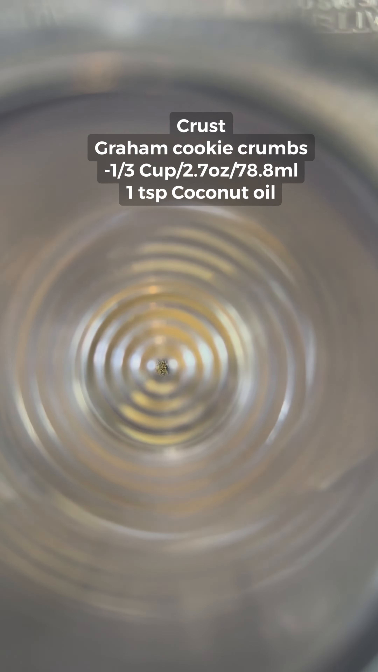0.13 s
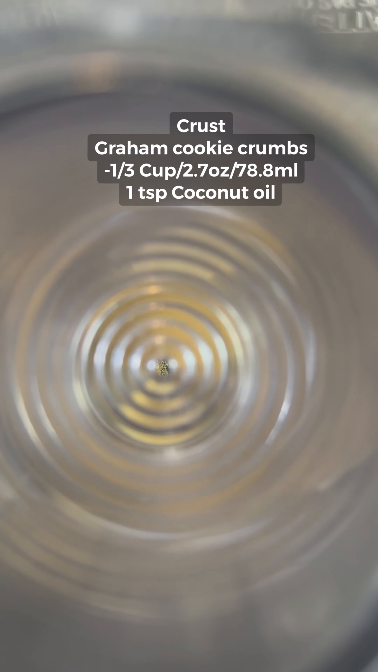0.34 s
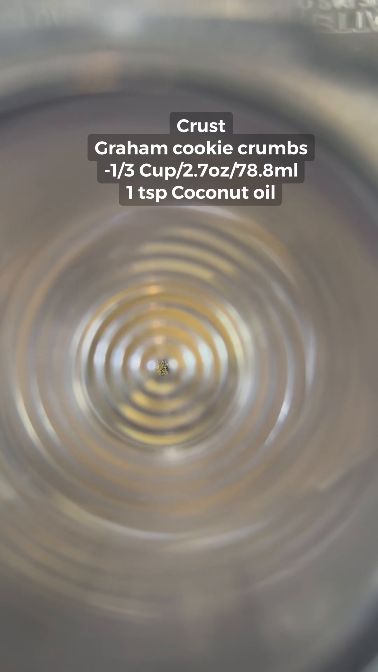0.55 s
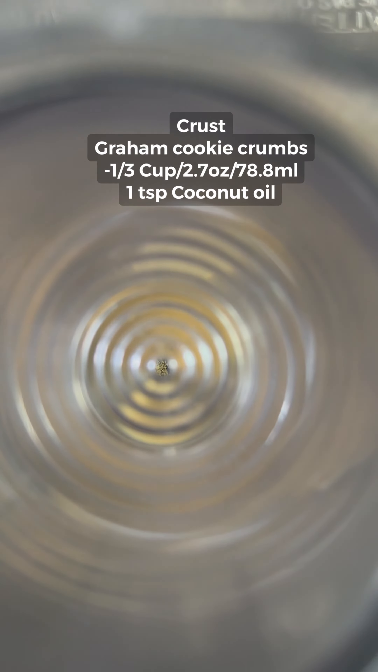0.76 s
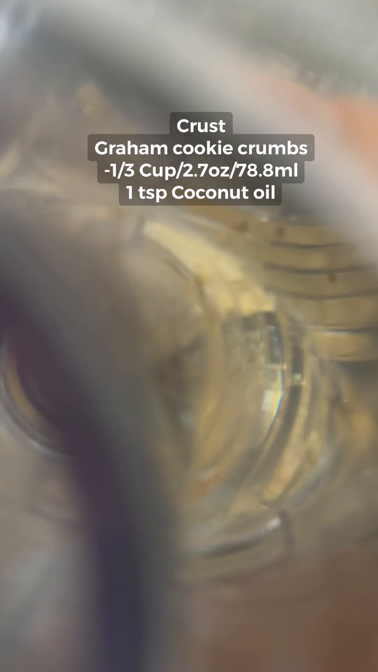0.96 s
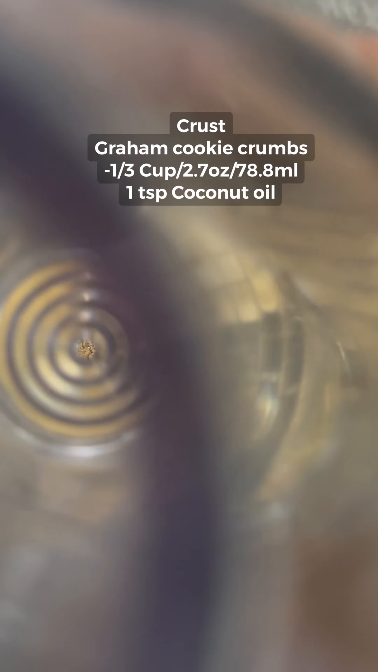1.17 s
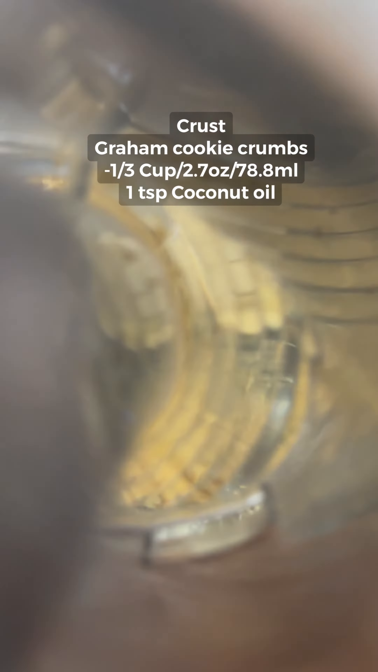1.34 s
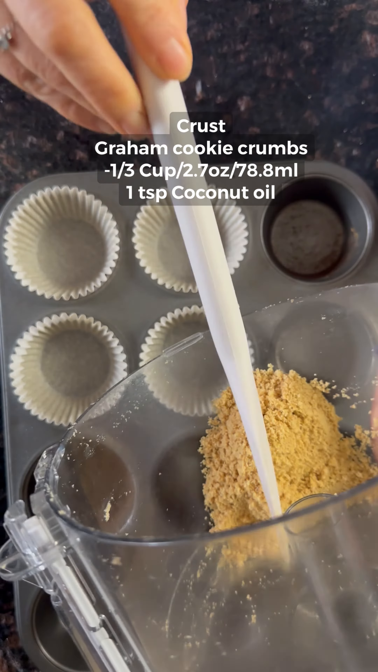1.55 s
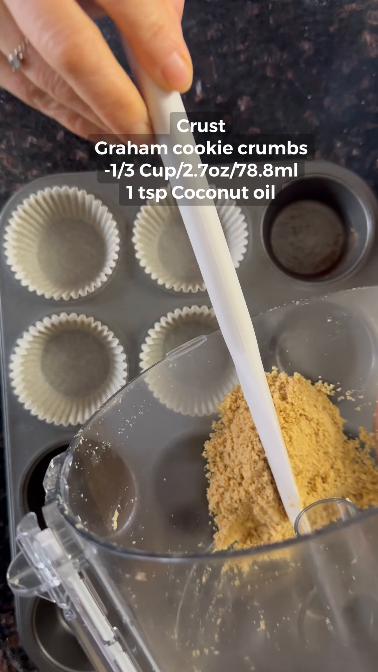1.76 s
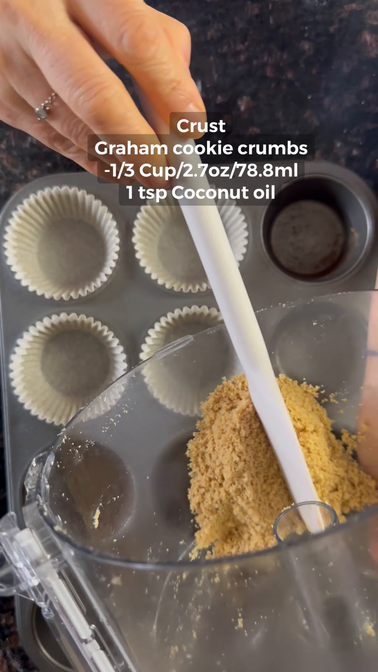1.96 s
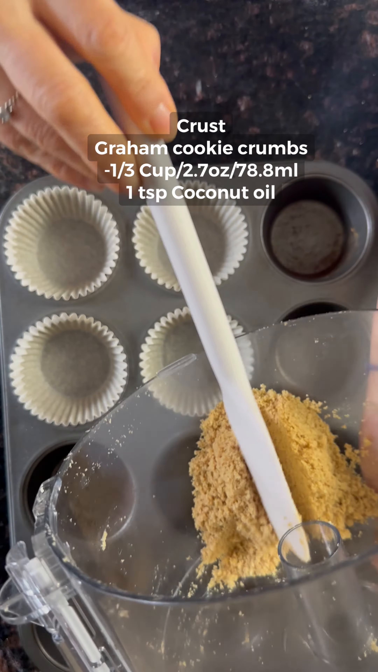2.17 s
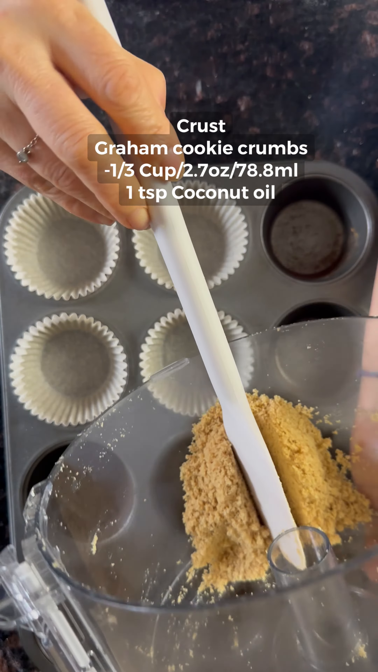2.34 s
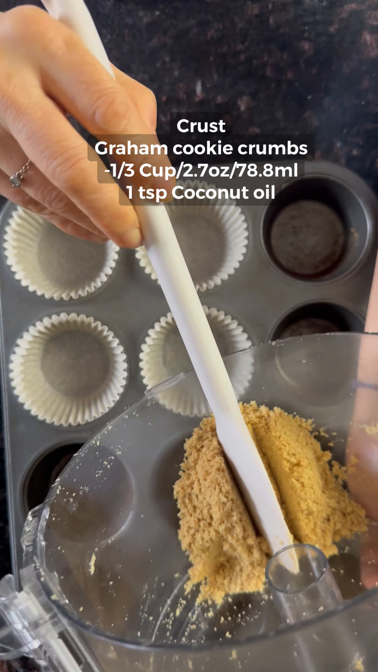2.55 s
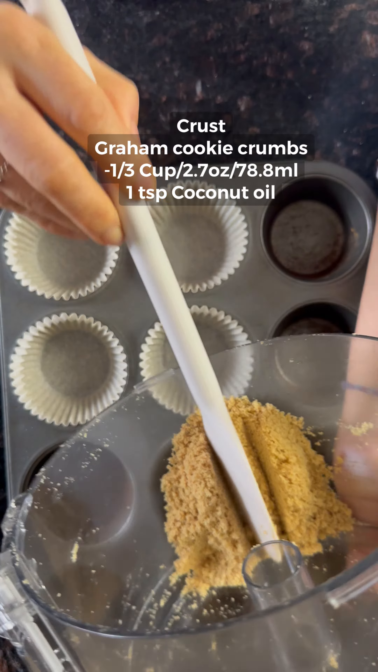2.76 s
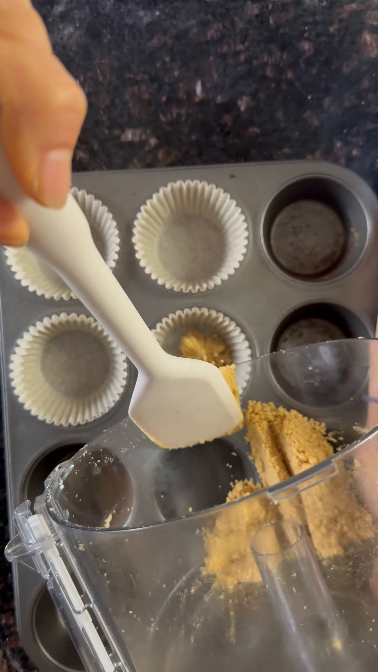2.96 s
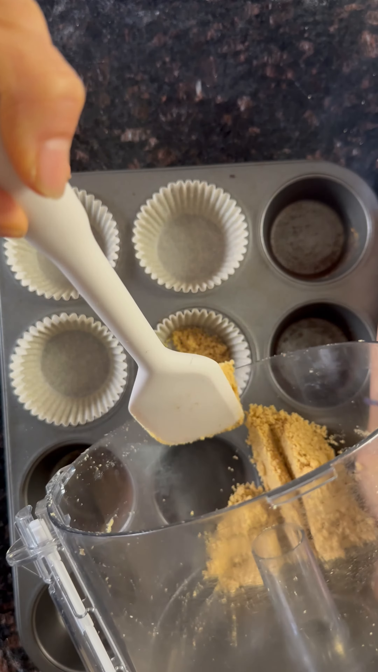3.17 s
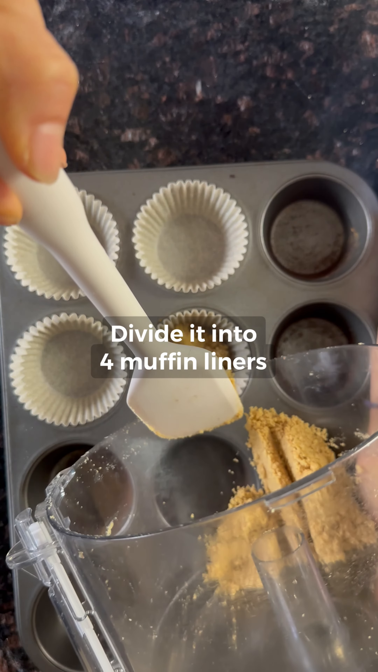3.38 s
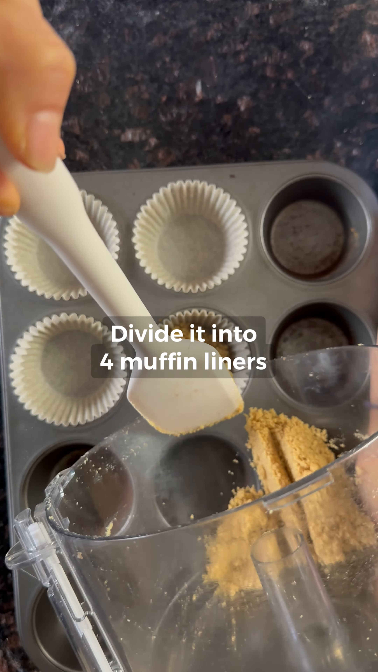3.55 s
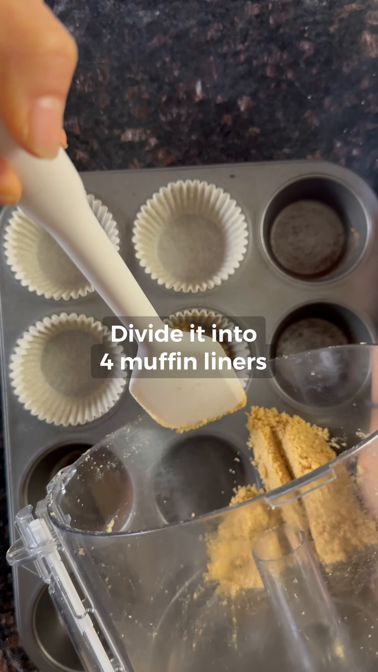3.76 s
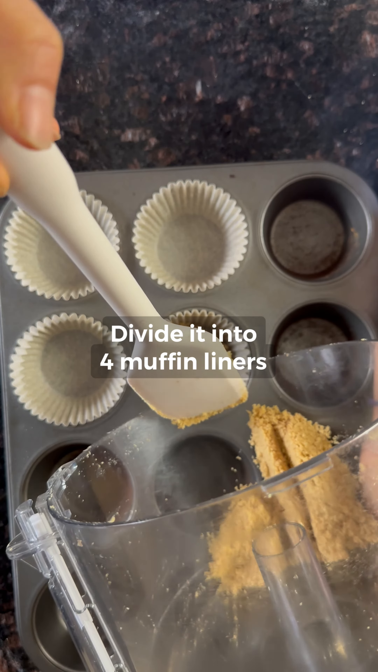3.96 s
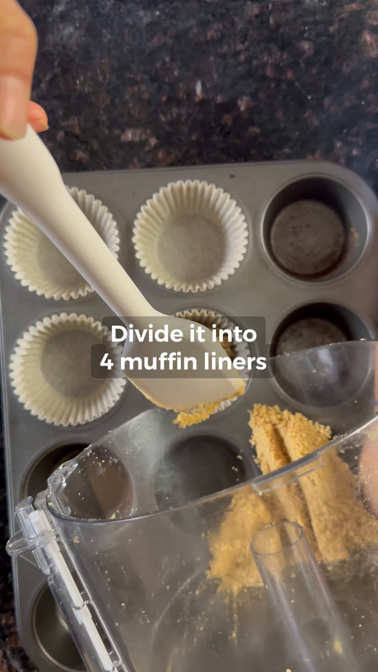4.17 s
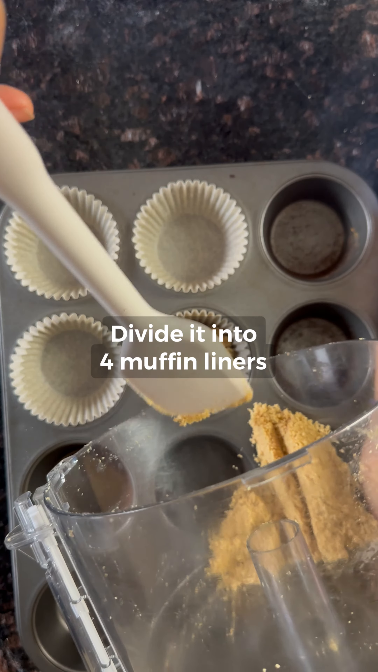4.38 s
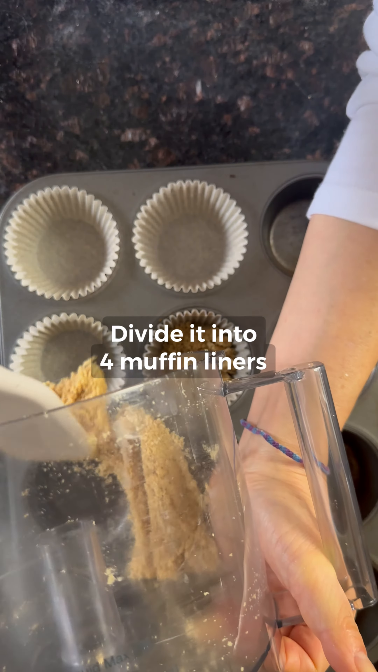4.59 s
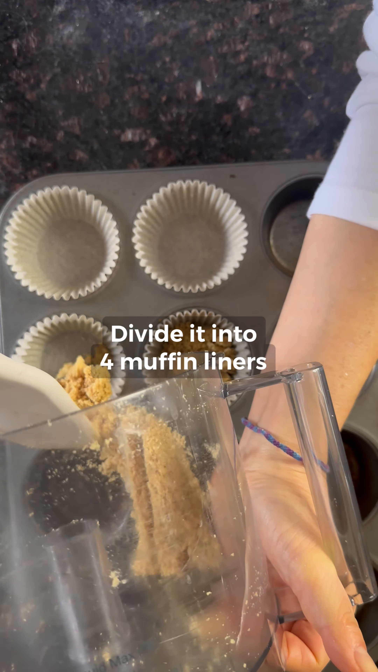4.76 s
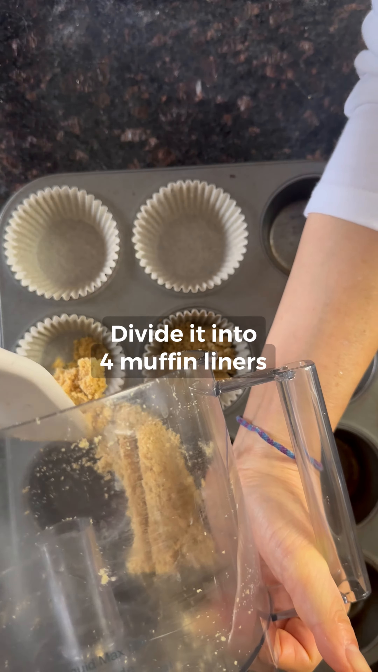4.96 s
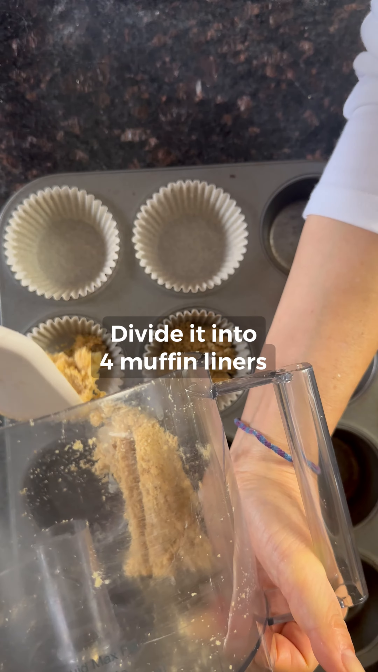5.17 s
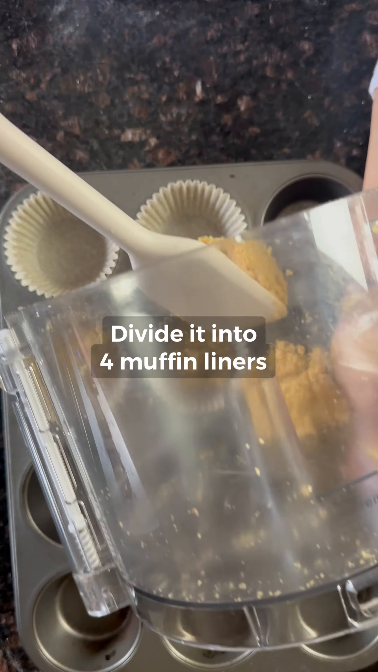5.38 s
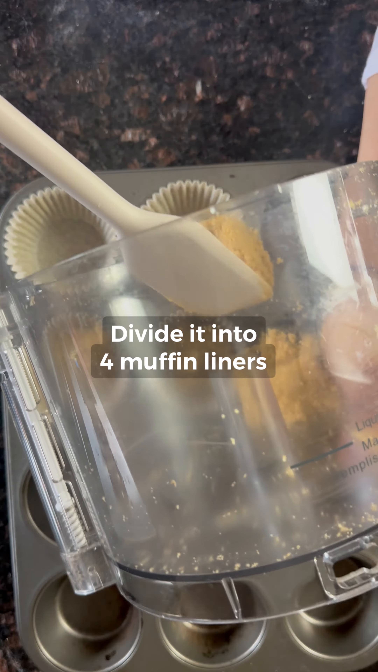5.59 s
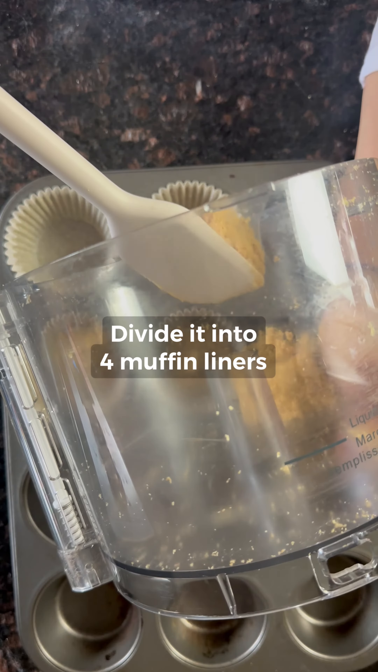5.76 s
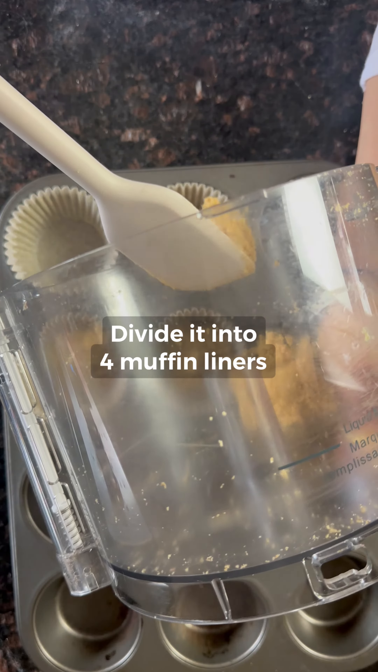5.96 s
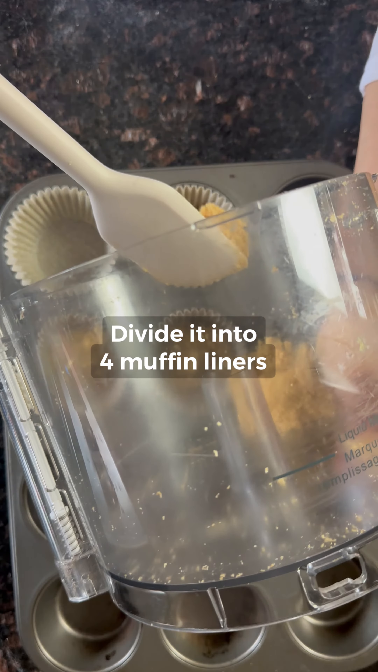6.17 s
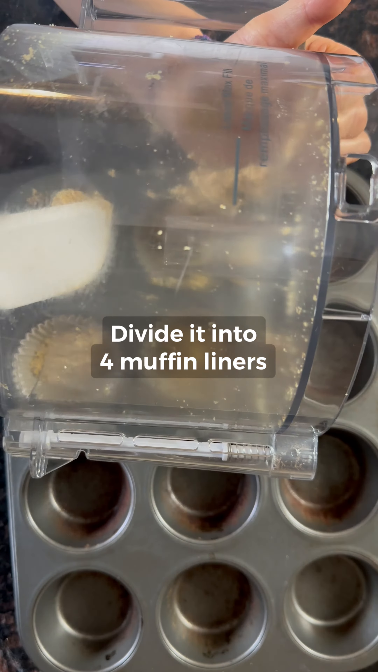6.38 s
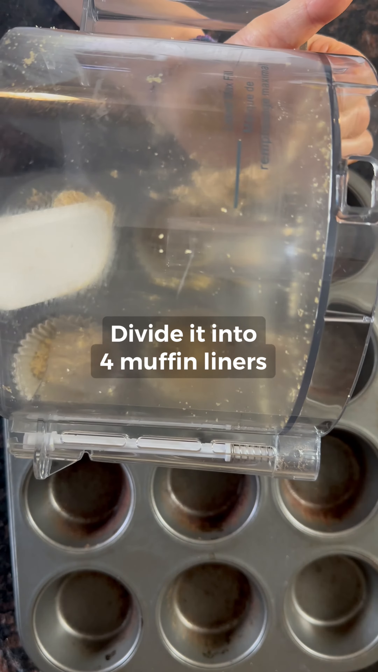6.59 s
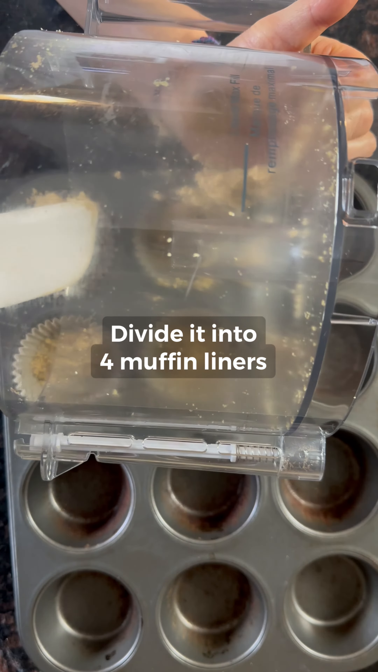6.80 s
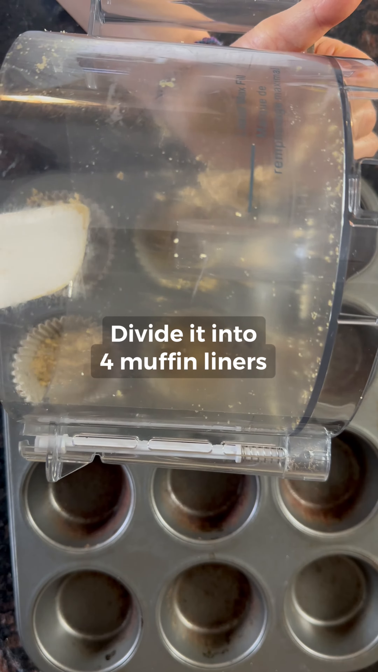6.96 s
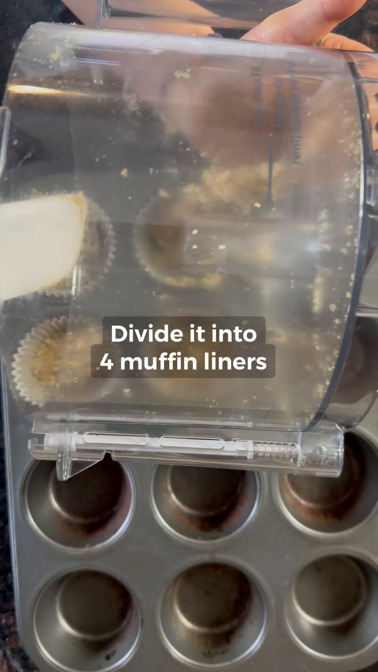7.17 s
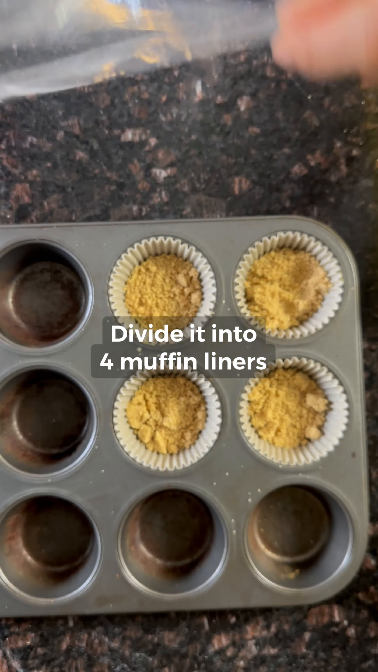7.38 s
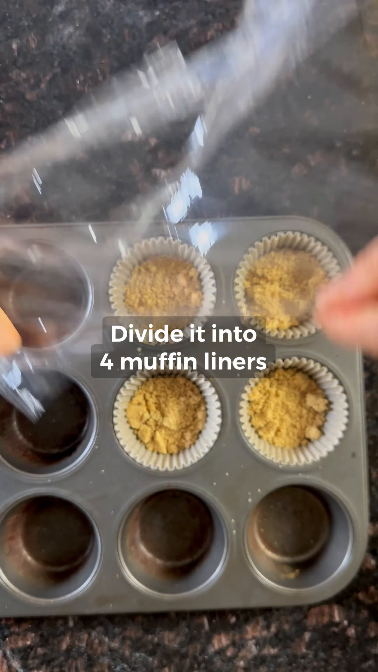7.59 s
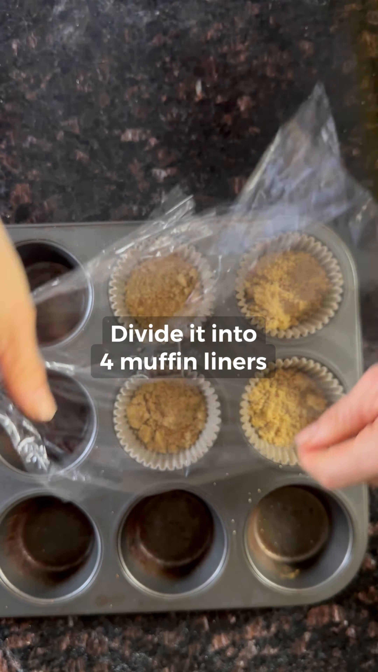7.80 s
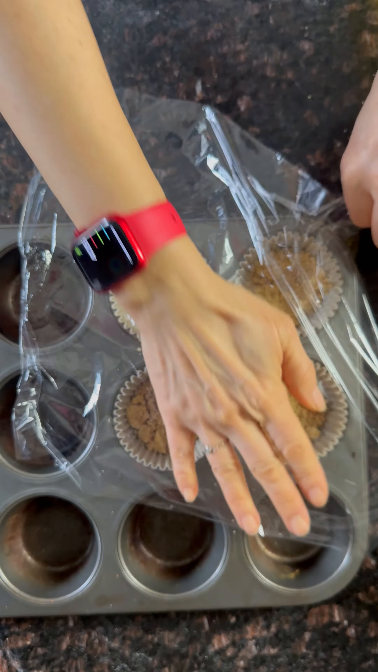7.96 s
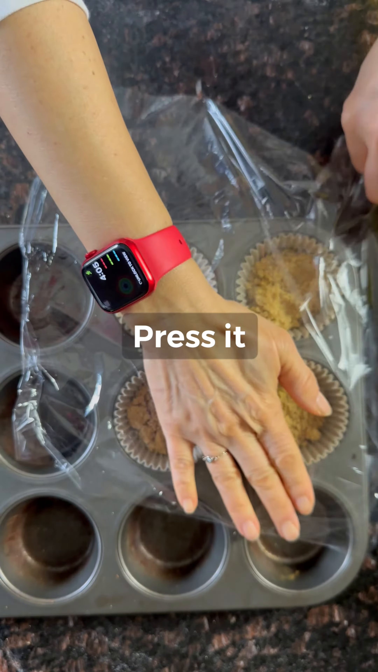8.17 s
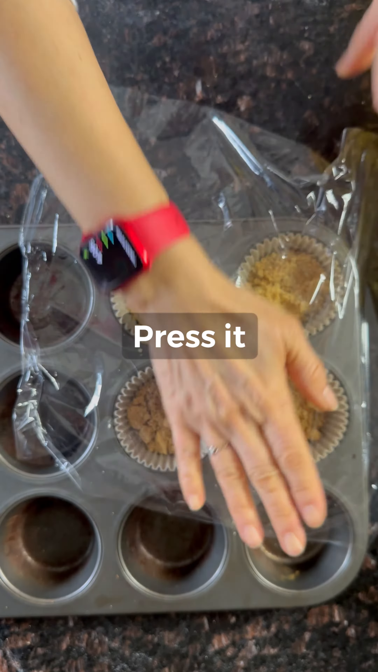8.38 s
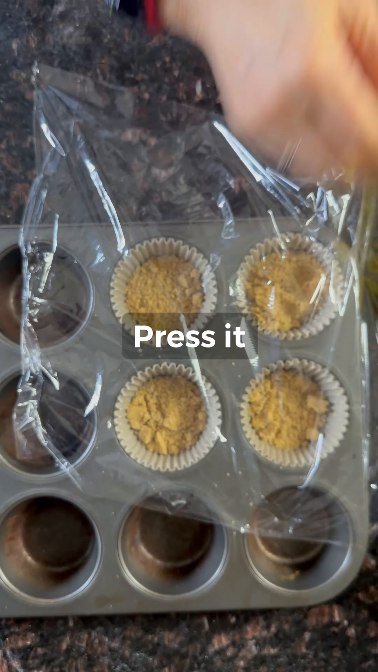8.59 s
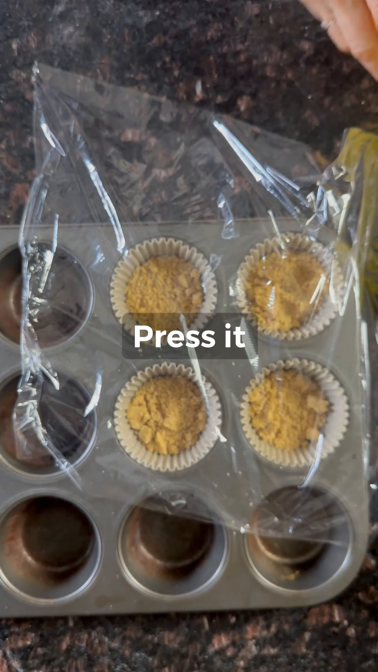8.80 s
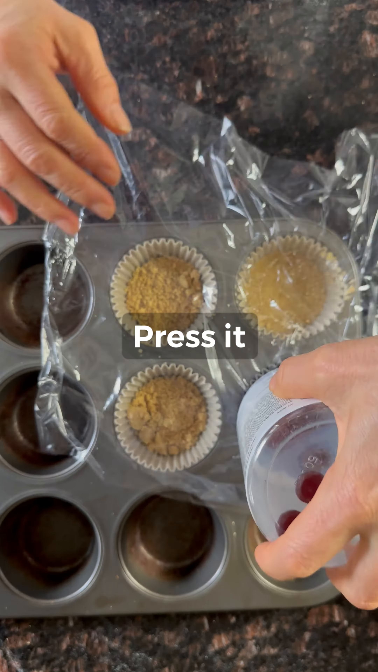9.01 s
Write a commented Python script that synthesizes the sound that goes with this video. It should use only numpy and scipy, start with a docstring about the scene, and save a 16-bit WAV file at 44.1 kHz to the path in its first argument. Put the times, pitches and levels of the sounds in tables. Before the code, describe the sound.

A harsh small motor runs under a second and stops dead. After faint knocks comes one strong plastic clack. Then quiet, dry taps, ticks and gritty scrapes of a spatula on a thin plastic bowl, with dull handling bumps. Cling film rustles and snaps, skin squeaks briefly, and a baking tin rattles. Close stereo microphone, short kitchen reverberation, faint hum and ventilation.

```python
"""A small food processor grinds cookie crumbs and stops dead: buzz and blade tones over pulsing noise.
Its plastic lid is unlatched with a clack: impulses ring modes under a bright burst of grains.
A spatula scrapes crumbs from the bowl into liners in a muffin tin: grains excite a thin resonant wall.
Cling film, as coloured crackle, is spread and pressed down; the tin rattles and skin squeaks on the film.
Once the motor has stopped, an appliance hums over ventilation noise, in steps of level."""
import sys
import numpy as np
from scipy import signal
from scipy.fft import rfft, irfft, next_fast_len
from scipy.io import wavfile
from scipy.ndimage import uniform_filter1d

SR = 44100
rng = np.random.default_rng(int(sys.argv[2]) if len(sys.argv) > 2 else 0)


def wav_out(sig):
    """Save sig, one row per channel (or a flat mono array), as 16-bit PCM at SR to the path in sys.argv[1]."""
    wavfile.write(sys.argv[1], SR, np.round(np.clip(np.atleast_2d(sig).T, -1, 1) * 32767).astype(np.int16))


N = 398663
TIME = np.arange(N) / SR
MAINS_HZ = 60

# left-right likeness of near sources: f/Hz, likeness [1 = identical]
NEAR_LIKENESS = [(150, 1.0), (700, 0.68), (2400, 0.76), (4400, 0.19), (8000, 0.85), (15000, 1)]
# the spatula taps the bowl, each time at another spot: t/s, peak level/dB, favoured f/Hz
BOWL_TAPS = [(1.838, -35.5, 2600), (2.034, -45.5, 940), (2.263, -38.5, 1280), (2.563, -36.5, 1600),
             (2.589, -37, 1700), (2.74, -36, 520)]
# the palm presses the film onto the tin: t/s, length/s, relative level/dB
FILM_PRESSES = [(8.69, 0.031, -61), (8.759, 0.23, -51), (9.019, .03, -41.5)]


def from_db(db):
    """Logarithmic level law: decibels to amplitude gain."""
    return 10 ** (np.asarray(db) / 20)


def rms_one(x):
    """Power normalisation: scale to unit mean square."""
    return x / np.sqrt(np.mean(x ** 2) + 1e-20)


def at_hz(points, hz):
    """Interpolation of a table on a logarithmic frequency axis."""
    table = np.array(points)
    return np.interp(np.log(hz + 1), np.log(table[:, 0]), table[:, 1])


def colour(x, spectrum, size=8192):
    """Minimum-phase filtering: a causal response of the given spectrum; white noise keeps its power."""
    gain = from_db(at_hz(spectrum, np.fft.rfftfreq(size, 1 / SR)))
    cepstrum = irfft(np.log(gain))
    # folding the cepstrum onto positive time makes the response causal
    cepstrum[1:size // 2] *= 2
    cepstrum[size // 2 + 1:] = 0
    response = irfft(np.exp(rfft(cepstrum)))
    return signal.oaconvolve(np.atleast_2d(x), response[None] / np.linalg.norm(response))[:, :N]


def spread(pair, likeness):
    """Interaural coherence: mixing unrelated signals as mid and side sets their likeness by frequency."""
    size = next_fast_len(N)
    alike = np.clip(at_hz(likeness, np.fft.rfftfreq(size, 1 / SR)), -.999, .9999)
    mid, side = rfft(pair, size) * np.sqrt([(1 + alike) / 2, (1 - alike) / 2])
    return irfft(np.array([mid + side, mid - side]), size)[:, :N]


def drift(rate_hz):
    """Low-pass random process: slow chance with unit rms."""
    step = 40  # samples between the computed values
    r = np.exp(-2 * np.pi * step * rate_hz / SR)
    settle = 2000  # discarded values
    noise = rng.standard_normal(N // step + settle + 2)
    slow = signal.lfilter([1], [1, -2 * r, r * r], noise)[settle:]
    return np.interp(np.arange(N) / step, np.arange(len(slow)), rms_one(slow))


def grains(per_s, unevenness_db):
    """Poisson impact noise: two streams of tiny impulses of uneven size and random sign; unit power."""
    born = rng.random((2, N)) < per_s / SR
    sizes = from_db(unevenness_db * np.minimum(rng.standard_exponential((2, N)), 4))
    return rms_one(born * sizes * np.sign(rng.random((2, N)) - .5))


def resonance(x, hz, width_hz):
    """Damped oscillator: a two-pole resonance with gain 1 at its peak."""
    r = np.exp(-np.pi * width_hz / SR)
    numerator = np.array([1, 0, -1]) * (1 - r * r) / 2
    denominator = [1, -2 * r * np.cos(2 * np.pi * hz / SR), r * r]
    return signal.lfilter(numerator, denominator, x + 1e-18)


def ring(force, modes):
    """Modal superposition: a force drives decaying sines; white noise keeps its power."""
    t = TIME[:SR // 2]
    response = 0
    for k, (hz, db, t60) in enumerate(modes):
        response = response + (-1) ** k * from_db(db - 60 * t / t60) * np.sin(2 * np.pi * hz * t)
    return signal.oaconvolve(force, response / np.linalg.norm(response))[:N]


def contacts(rows, rise_s, fall_s):
    """Power addition of contact forces (s, length, dB): each builds up, holds and dies away."""
    power = np.zeros(N)
    for s, length, db in rows:
        start = int(s * SR)
        t = TIME[:min(N - start, int((length + 10 * fall_s) * SR))]
        build_up = 1 - np.exp(-t / rise_s)
        decay = np.exp(-np.maximum(t - length, 0) / fall_s)
        power[start:start + len(t)] += (from_db(db) * build_up * decay) ** 2
    return np.sqrt(power)


def clicks(rows):
    """Ideal impact: one unit-sample impulse for each row (s, dB)."""
    out = np.zeros(N)
    for s, db in rows:
        out[int(s * SR)] += from_db(db)
    return out


def held(rows, size=256):
    """Stepwise gain: each dB column holds until the next row with a quick fade; silent before the first."""
    s, *columns = np.transpose(rows)
    row = np.searchsorted(s, TIME)
    return [uniform_filter1d(np.append(0, from_db(c))[row], size) for c in columns]


def taps(rows, modes, focus_db):
    """Selective modal excitation: a mode loses focus_db per octave away from each tap's favoured pitch."""
    t = TIME[:SR // 3]
    out = np.zeros(N + SR)
    for s, db, favoured_hz in rows:
        sound = 0
        for hz, mode_db, t60 in modes:
            loss_db = focus_db * abs(np.log2(hz / favoured_hz))
            decay = from_db(mode_db - loss_db - 60 * t / t60)
            sound = sound + decay * np.sin(2 * np.pi * hz * t) * rng.choice([-1, 1])
        start = int(s * SR)
        out[start:start + len(t)] += from_db(db) * sound / np.abs(sound).max()
    return out[:N]


def room(x, early_t60_s=0.12, late_t60_s=0.39, late_db=12.0):
    """Exponential reverberation: quick worktop and bowl reflections plus a diffuse tail, one per ear."""
    t = TIME[:int(.7 * SR)]
    decay = from_db(-60 * t / early_t60_s) + from_db(late_db - 60 * t / late_t60_s)
    tail = rng.standard_normal((2, len(t))) * decay * (t > .003)
    return signal.oaconvolve(x, tail / np.linalg.norm(tail[0]), axes=1)[:, :N]


def kitchen(drone_db=-14.5, drone_width_hz=45, rush_hz=660, rush_width_hz=520):
    """Magnetic hum at twice the mains frequency in a resonant drone, with flow noise and a hollow rush."""
    # background level steps: from t/s, hum level/dB, air level/dB, rush level/dB
    background_steps = [(.82, -50.5, -54.5, -82), (1.435, -39.5, -47.5, -69), (5.35, -39.5, -51, -116)]
    # ventilation noise spectrum: f/Hz, relative level/dB per Hz
    air_spectrum = [(30, -7.5), (80, 5), (220, -3), (340, -16), (720, -20.5), (1050, -28.5), (2100, -28),
                    (3500, -38.5), (7000, -39.5), (12000, -64.5)]
    hum_gain, air_gain, rush_gain = held(background_steps)
    hum = np.sqrt(2) * np.sin(2 * np.pi * 2 * MAINS_HZ * TIME)
    drone = rms_one(resonance(resonance(rng.standard_normal(N), 139.0, drone_width_hz), 129, 41))
    air = colour(rng.standard_normal((2, N)), air_spectrum)
    rush = resonance(rng.standard_normal(N), rush_hz, rush_width_hz)
    rush = rms_one(resonance(rush, rush_hz, rush_width_hz))
    humming = hum_gain * (hum + from_db(drone_db) * drone)
    return humming + air_gain * spread(air, NEAR_LIKENESS) + rush_gain * rush


def bumps(level_db=-5.5, lowest_hz=38):
    """Reciprocity of duration and bandwidth: soft thuds of the bowl shifting in the hand, longer ones duller."""
    # dull handling bumps: t/s, length/s, relative level/dB
    bump_rows = [(1.438, 0.022, -38), (1.627, 0.093, -39.5), (2.11, 0.065, -26), (2.575, 0.069, -26.5),
                 (3.305, 0.063, -40), (4.419, 0.039, -33.5), (4.589, 0.034, -39.5), (5.06, .05, -36),
                 (5.683, 0.099, -42), (7.31, 0.081, -37)]
    bump_cycles = 7.4  # upper band edge times length
    out = np.zeros(N)
    for s, length, db in bump_rows:
        highest_hz = max(bump_cycles / length, lowest_hz * 1.2)
        band = signal.butter(3, [lowest_hz, highest_hz], "band", fs=SR, output="sos")
        start, span = int(s * SR), int(2 * length * SR)
        thud = signal.sosfilt(band, rng.standard_normal(SR))[-span:]
        swell = np.sin(np.pi * np.linspace(0, 1, span) ** .5) ** 2
        out[start:start + span] += from_db(level_db + db) * rms_one(thud * swell)
    return out


def dry_clicks(fall_s=0.0015):
    """Exponential relaxation: two dull clicks without ring, each a sudden step that dies away."""
    # dull clicks: t/s, peak level/dB
    click_rows = [(6.337, -33.5), (7.217, -35)]
    return signal.lfilter([1], [1, -np.exp(-1 / (fall_s * SR))], clicks(click_rows) + 1e-18)


def squeaks(jitter=0.068):
    """Stick-slip friction: skin slipping on the film gives unsteady harmonic chirps that sag in pitch."""
    # chirps: t/s, length/s, starting f/Hz, level before the swell/dB
    squeak_rows = [(8.286, 0.028, 1650, -56.5), (8.319, .018, 2750, -55.5)]
    # harmonics: multiple of the pitch, relative level/dB
    partials = [(1, 2), (2, -5), (4, -1), (5, -3)]
    sag_per_s = 2.6  # share of the starting pitch lost per second
    out = np.zeros(N)
    unsteady = 1 + jitter * drift(260)
    for s, length, hz, db in squeak_rows:
        t = TIME[:int(length * SR)]
        span = int(s * SR) + np.arange(len(t))
        phase = 2 * np.pi * np.cumsum(hz * (1 - sag_per_s * t) * unsteady[span]) / SR
        tone = sum(from_db(partial_db) * np.sin(round(k) * phase) for k, partial_db in partials)
        swell = np.sin(np.pi * np.sqrt(t / length)) ** 2
        out[span] += from_db(db) * swell * rms_one(tone)
    return out


def press_force():
    """Contact dynamics: the palm presses quickly and lets go."""
    return contacts(FILM_PRESSES, rise_s=0.003, fall_s=0.012)


def tin(rattle_db=-3.5):
    """Modal ringing: the tin knocks on the counter, and the pressing force makes it rattle there."""
    # knocks on the counter: t/s, peak level/dB, favoured f/Hz
    tin_knocks = [(8.692, -39, 775), (8.761, -34, 1000), (8.783, -34.5, 780), (8.915, -42, 1400),
                  (8.984, -36, 1400), (9.020, -32.5, 1480)]
    # modes of the tin: f/Hz, relative level/dB, t60/s
    tin_modes = [(230, 9, 0.041), (657, 7.5, 0.028), (808, 4.5, 0.041), (1080, -3, 0.04), (1280, 1, 0.015),
                 (1520, -2, 0.023)]
    force = press_force() * grains(per_s=400, unevenness_db=3.5)[0]
    return taps(tin_knocks, tin_modes, focus_db=7.5) + from_db(rattle_db) * ring(force, tin_modes)


def film(clump_db=1.0, crease_s=0.0015):
    """Crackling noise by buckling: moved film rustles in irregular crackles, and whole creases snap over."""
    # film pulled out, laid down and smoothed: t/s, length/s, relative level/dB
    sweeps = [(7.24, 0.32, -58.5), (7.63, 0.17, -55.5), (7.87, 0.22, -63), (7.99, 0.22, -47.5),
              (8.215, 0.078, -60)]
    # single creases snap over: t/s, relative level/dB
    snaps = [(7.358, -44.5), (7.633, -52), (7.739, -58), (7.998, -48), (8.086, -37), (8.117, -41),
             (8.323, -44.5), (8.438, -56), (8.869, -56)]
    # crinkle spectrum: f/Hz, relative level/dB per Hz
    crinkle_spectrum = [(700, -0.5), (2500, -3.5), (4500, -6), (6000, -2.5), (8000, -1), (10500, -10),
                        (13000, -27), (15500, -3.5)]
    # snap spectrum: f/Hz, relative level/dB per Hz
    snap_spectrum = [(500, -2.5), (4500, -7.5), (6300, 5.5), (11000, -11.5), (15500, -1)]
    rest_db = -73.5  # creases keep easing between the moves
    moves = contacts(sweeps, rise_s=0.055, fall_s=0.012) + press_force()
    moves = moves + from_db(rest_db) * (TIME > sweeps[0][0])
    crackles_per_s, crackle_s, crackle_share = 90, .0012, .7
    bursts = grains(crackles_per_s, unevenness_db=1.5)[0] ** 2
    crackles = signal.lfilter([1], [1, -np.exp(-1 / (crackle_s * SR))], bursts + 1e-18)
    flutter = np.sqrt(1 - crackle_share + crackle_share * crackles / crackles.mean())
    flutter = flutter * from_db(clump_db * drift(25))
    crinkles = grains(per_s=5000, unevenness_db=3.0)
    snap_force = contacts([(s, crease_s, db) for s, db in snaps], rise_s=0.0004, fall_s=0.0054)
    creases = snap_force * grains(per_s=7400, unevenness_db=-2.5)
    return colour(moves * flutter * crinkles, crinkle_spectrum) + colour(creases, snap_spectrum)


def wall_resonance(x, size=256):
    """Resonant high-pass: the wall peaks at its lowest resonance, whose pitch moves with the contact point."""
    # lowest resonance at the contact point: t/s, f/Hz
    wall_pitch = [(2.6, 1270), (4.7, 1530), (5.0, 1620), (5.85, 690), (6.36, 1000)]
    damping = .2
    out, state = np.zeros_like(x), np.zeros((2, 2))
    pitch = np.interp(TIME, *np.transpose(wall_pitch))
    for i in range(0, N, size):
        w = 2 * np.pi * pitch[i] / SR
        r = np.exp(-damping * w)
        numerator, denominator = [r, -2 * r, r], [1, -2 * r * np.cos(w), r * r]
        block = x[:, i:i + size] + 1e-18
        out[:, i:i + size], state = signal.lfilter(numerator, denominator, block, zi=state)
    return out


def bowl(force, travel_rate_hz=25, count=36):
    """Modal density of a thin wall: which of many close modes speak changes as the contact point travels."""
    width_hz, share = 170, .3  # share: part of the power that rings
    modes_hz, spacing = np.linspace(800, 8500, count, retstep=True)
    modes_hz = modes_hz + spacing * (rng.random(count) - .5)
    rings = sum(resonance(force * drift(travel_rate_hz), hz, width_hz) for hz in modes_hz)
    ring_gain = np.sqrt(share * 2 * spacing / (np.pi * width_hz))
    return np.sqrt(1 - share) * force + ring_gain * rings


def spatula(crunch_db=0.0, wall_db=-3.0, tick_db=2.5, tick_s=0.0037, judder_db=0.5):
    """Fracture and friction noise: contacts, mostly the spatula's, mix crackle and wall ring by kind."""
    # clumps break off and land in the liners: t/s, length/s, relative level/dB
    clumps = [(2.838, 0.015, -51), (2.944, 0.011, -39), (3.338, 0.024, -41.5), (4.204, 0.0082, -51),
              (4.635, 0.011, -40), (4.669, 0.034, -40.5), (4.708, 0.015, -31), (4.777, 0.0057, -32.5),
              (4.845, 0.0041, -32.5), (4.972, 0.0065, -33), (5.07, 0.058, -40.5), (5.203, 0.048, -42.5),
              (5.332, 0.0067, -36.5), (5.385, 0.015, -38), (5.43, 0.019, -40.5), (5.601, 0.011, -32),
              (5.766, 0.054, -46), (5.831, 0.029, -36), (5.936, 0.027, -45), (5.974, 0.024, -32),
              (6.209, 0.015, -40.5), (6.36, 0.011, -33.5)]
    # short dull rubs on a hollow surface: the spatula on the bowl wall, at 8.172 s the hand on the film:
    # t/s, length/s, relative level/dB
    rubs = [(2.257, 0.013, -52), (2.455, 0.018, -52.5), (2.53, 0.037, -57), (2.56, 0.068, -50),
            (2.731, 0.007, -45), (4.46, 0.0045, -49.5), (4.575, 0.051, -59.5), (6.6, 0.19, -66),
            (6.795, 0.09, -62.5), (8.172, 0.046, -52.5)]
    # the spatula pushes the heap along: t/s, length/s, relative level/dB
    pushes = [(1.5, 1.7, -70.5), (4.085, 0.027, -50.5), (4.372, 0.014, -49.5), (4.52, .11, -72),
              (5.2, 0.12, -48), (6.63, 0.3, -62), (6.97, 0.073, -55)]
    # light ticks of spatula and crumbs, the one at 7.159 s of the film: t/s, relative level/dB
    ticks = [(2.897, -39), (2.933, -30.5), (3.097, -38), (3.148, -45.5), (3.251, -42), (3.313, -41.5),
             (3.614, -57), (4.511, -58), (6.135, -50), (6.795, -46.5), (7.159, -54)]
    # crunch of crumbs: f/Hz, relative level/dB per Hz
    crunch_spectrum = [(1200, -13.5), (2800, -13.5), (4200, -5), (5150, -9.5), (5750, 0), (6700, -1.5),
                       (7700, -1), (9500, -6.5), (11000, -10.5), (13000, -56), (15500, 0)]
    # friction on the hollow surface: f/Hz, relative level/dB per Hz
    wall_spectrum = [(500, -4), (1400, -2.5), (2900, 3.5), (4100, -1), (6000, -18.5)]
    clump_body_db, tick_body_db = -12, -18  # dull body, relative to clump and tick
    trickle_db, rub_crunch_db = -25, -5  # trickle relative to clump; crackle relative to rub
    scuff_s, scuff_db = 0.0038, -10.5  # the blade scuffs the wall as it lands; relative to the tap

    crush = contacts(clumps, rise_s=0.0015, fall_s=0.0068)
    thump = from_db(clump_body_db) * contacts(clumps, rise_s=0.0013, fall_s=0.014)
    trickle = from_db(trickle_db) * contacts(clumps, rise_s=0.03, fall_s=0.05)
    scuffs = [(s, scuff_s, db + scuff_db) for s, db, hz in BOWL_TAPS]
    rub = contacts([*rubs, *scuffs], rise_s=0.0012, fall_s=0.0046) * from_db(judder_db * drift(70))
    slide = contacts(pushes, rise_s=0.0023, fall_s=0.04)
    snap = contacts([(s, tick_s, db) for s, db in ticks], rise_s=0.00024, fall_s=0.0098)
    snap = from_db(tick_db) * snap

    bright = from_db(crunch_db) * (crush + trickle + slide + from_db(rub_crunch_db) * rub) + snap
    dull = from_db(wall_db) * (thump + rub) + from_db(tick_body_db) * snap
    crackle = grains(per_s=9000, unevenness_db=1.5) * from_db(4.0 * drift(103))
    friction = grains(per_s=4200, unevenness_db=1.5)
    crunch = colour(bright * crackle, crunch_spectrum)
    return bowl(crunch + wall_resonance(colour(dull * friction, wall_spectrum)))


def lid(crack_db=-3.5, body_db=21.0, room_db=-19.0, lowest_hz=170):
    """Impulse response of a hollow shell: knocks ring its modes as it settles, with a bright chatter of parts."""
    # knocks: t/s, relative level/dB, contact length/s, weight of the low modes/dB
    knocks = [(0.931, -45, 0.0071, -15), (1.01, -47.5, 0.0018, -1), (1.124, -59, 0.035, 6),
              (1.168, -36, 0.0027, -15), (1.1858, -19.5, 0.0036, -3.5), (1.409, -38, 0.012, -6.5)]
    # the part drops into its seat and rebounds: delay/s, relative level/dB
    settling = [(.008, 6), (.03, -12.5)]
    # modes of the lid: f/Hz, relative level/dB, t60/s
    lid_modes = [(221, -8, .1), (307, -1, .1), (345, 0, .1), (410, 1, .09), (560, -4, .03), (786, 0, .12),
                 (855, 0, .09), (1060, -1, .04), (1986, -13, .06), (2379, -12, .07), (3133, -14, .045)]
    # crack spectrum: f/Hz, relative level/dB per Hz
    crack_spectrum = [(400, -0.5), (1100, -4.5), (1400, -14.5), (2000, 0.5), (2450, -1), (3300, -8.5),
                      (4500, -14), (6500, -17), (9500, -27), (15000, -84)]
    crack = contacts([(s, length, db) for s, db, length, weight in knocks], rise_s=0.00025, fall_s=0.006)
    impacts = []
    for s, db, length, weight in knocks:
        for delay, step_db in [(0.00088, 0.011), *settling]:
            impacts.append((s + delay, db + weight + body_db + step_db))
    high_pass = signal.butter(2, lowest_hz, "high", fs=SR, output="sos")
    body = signal.sosfilt(high_pass, ring(clicks(impacts), lid_modes))
    chatter = grains(per_s=9000, unevenness_db=1.5)
    bright = from_db(crack_db) * spread(colour(crack * chatter, crack_spectrum), NEAR_LIKENESS)
    direct = bright + body
    return direct + from_db(room_db) * spread(room(direct), NEAR_LIKENESS)


def lumps(turn):
    """Periodic impact excitation: lumps strike the wall most often once a turn, higher modes fainter."""
    # bowl resonances struck by lumps: f/Hz
    lump_modes_hz = [780, 890, 1400, 1650, 2020, 2280]
    per_s, width_hz, uneven_db = 90, 75, 9.0  # mean strikes per second at each resonance
    level_db = -49.5
    chance = per_s / SR * (1 + .5 * np.cos(turn[:SR]))
    out = 0
    for hz in lump_modes_hz:
        strikes = (rng.random(SR) < chance) * from_db(uneven_db * rng.random(SR))
        out = out + resonance(strikes, hz, width_hz) / np.sqrt(hz)
    return from_db(level_db) * np.pad(rms_one(out), (0, N - SR))


def motor(housing_db=-38.0, whirl_db=-44, waver_db=0.5):
    """Forced vibration: mains buzz, blade tone, a housing shaken in beats and a pulsing hail of crumbs."""
    # motor buzz: multiple of the mains frequency, rms level/dB
    buzz_partials = [(4, -44), (5, -31.8), (7, -47.5), (8, -57.5), (9, -59), (11, -57.5), (13, -55),
                     (24, -64.5)]
    # housing shaken by the blade: f/Hz, relative level/dB per Hz
    housing_spectrum = [(40, -64), (110, -19), (165, -21), (210, -5), (350, 4.5), (410, -7), (470, -17),
                        (750, -16.5), (1100, -22.5), (1700, -18), (2300, -31), (3200, -40)]
    # bowl resonances under the whirling crumbs: f/Hz, width/Hz, relative level/dB
    whirl_modes = [(2580, 29, -6), (3640, 216, -2.5), (4880, 200, -2.5), (5940, 580, -6.5), (7520, 196, 3),
                   (8370, 420, -3), (10760, 230, 0), (12130, 280, -2.5), (12900, 550, -3),
                   (14600, 1500, -7)]
    stop_s = .817
    blade_hz, blade_wander_hz, blade_tone_db = 228.7, 11, -41  # the load makes the blade wander
    beat_db, surge_db, torque_db, left_db = 2.0, .7, .9, .4

    mains = 2 * np.pi * MAINS_HZ * TIME
    blade = 2 * np.pi * np.cumsum(blade_hz + blade_wander_hz * drift(24.6)) / SR
    turn = blade / 8  # the blade beats against the crumbs eight times a turn
    buzz = 0
    for k, db in buzz_partials:
        gain = from_db(db + waver_db * drift(1.0))
        buzz = buzz + gain * np.sin(round(k) * mains + rng.uniform(0, 2 * np.pi))
    tones = np.sqrt(2) * (buzz + from_db(blade_tone_db) * np.sin(blade))

    pulsing = from_db(beat_db * np.cos(blade) + surge_db * np.cos(turn))
    beats = pulsing * grains(per_s=5000, unevenness_db=2.5)
    housing = from_db(housing_db) * colour(beats, housing_spectrum)
    hail = grains(per_s=20000, unevenness_db=4.5)
    hail = hail * from_db(torque_db * (np.cos(2 * mains) + drift(90)))
    whirl = 0
    for k, (hz, width_hz, db) in enumerate(whirl_modes):
        whirl = whirl + (-1) ** k * from_db(db) * resonance(hail, hz, width_hz)
    whirl = from_db(whirl_db) * rms_one(whirl)

    running = np.clip((stop_s - TIME) / .002, 0, 1)
    balance = from_db([[left_db], [-left_db]])
    return balance * running * (tones + lumps(turn) + spread(housing + whirl, NEAR_LIKENESS))


def scene(room_db=-7.5, film_room_db=-8.5, tap_room_db=-5.0):
    """Linear superposition of all sources, the worktop ones with reflections of a small kitchen."""
    # left-right likeness of crumbs, film and echoes: f/Hz, likeness [1 = identical]
    bowl_likeness = [(200, .98), (1400, .85), (3100, .5), (7000, .5), (9500, .2), (12000, -.6)]
    # modes of the tapped bowl: f/Hz, relative level/dB, t60/s
    bowl_modes = [(497, 3, 0.06), (853, 2.5, 0.044), (1257, 1, 0.066), (2190, 2, 0.017), (2590, 3.5, 0.027)]
    crumbs, wrap = spatula(), film()
    knocks = tin() + taps(BOWL_TAPS, bowl_modes, focus_db=5.0) + squeaks()
    knocks = np.tile(knocks, (2, 1))
    to_room = from_db(room_db) * crumbs + from_db(film_room_db) * wrap + from_db(tap_room_db) * knocks
    worktop = spread(crumbs + wrap + room(to_room), bowl_likeness) + knocks
    return motor() + lid() + worktop + bumps() + dry_clicks() + kitchen()


def record(dry):
    """Band limitation: a steep elliptic low-pass at 16 kHz removes the top."""
    return signal.sosfilt(signal.ellip(10, .2, 80, 16000, fs=SR, output="sos"), dry)


dry = scene()
out = record(dry)
wav_out(out)
```